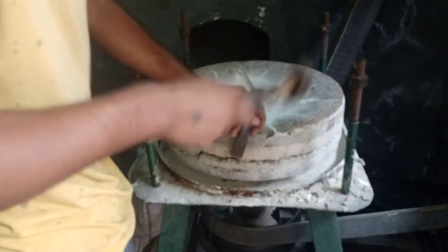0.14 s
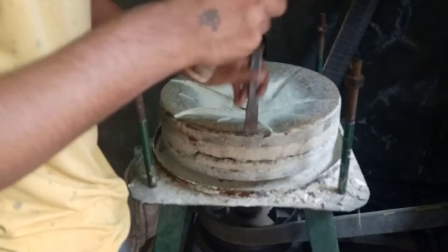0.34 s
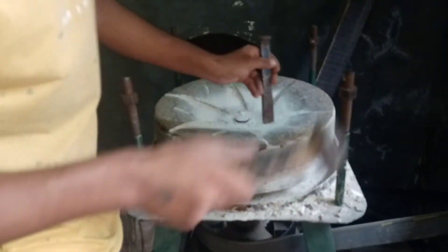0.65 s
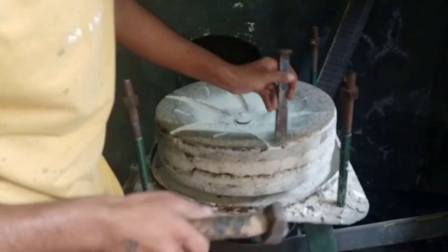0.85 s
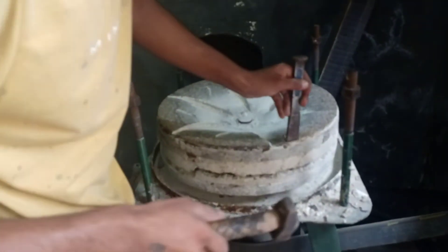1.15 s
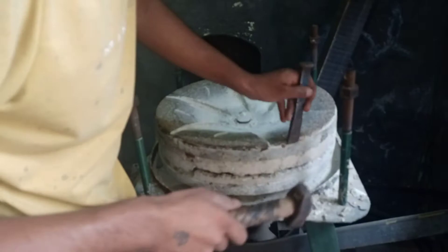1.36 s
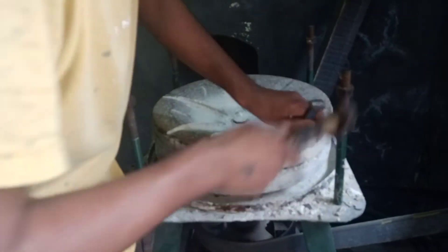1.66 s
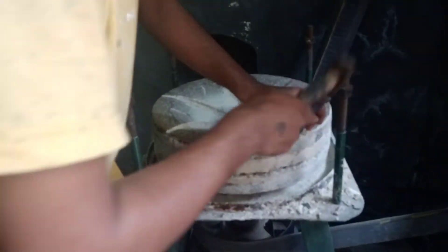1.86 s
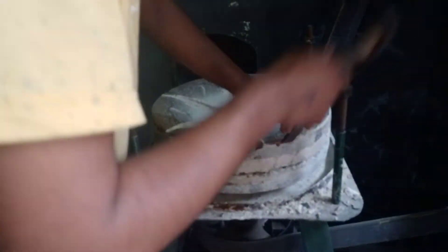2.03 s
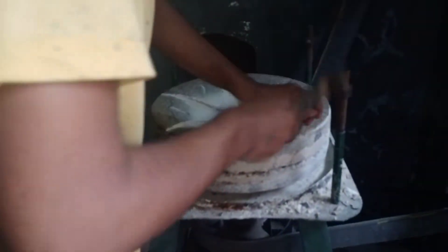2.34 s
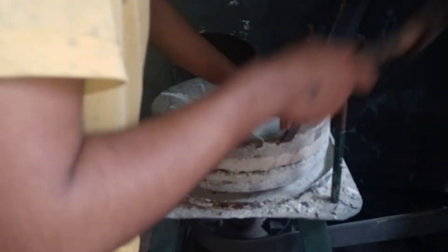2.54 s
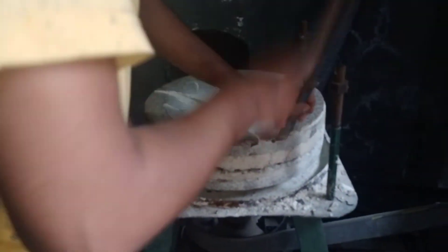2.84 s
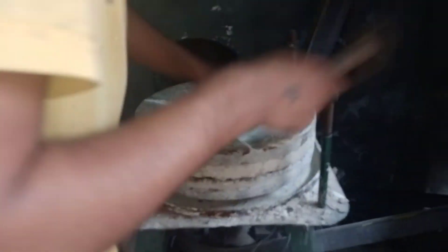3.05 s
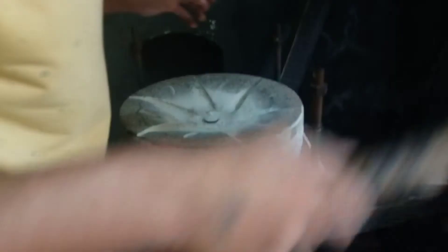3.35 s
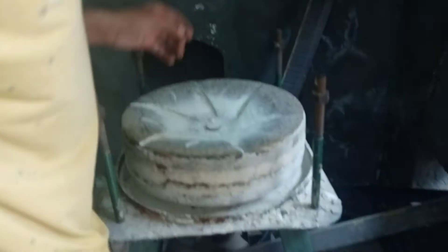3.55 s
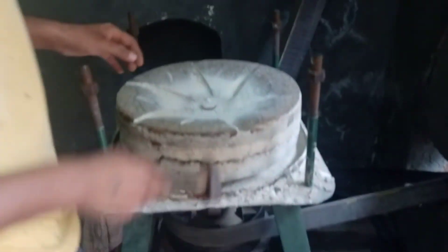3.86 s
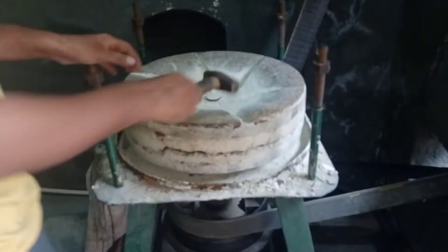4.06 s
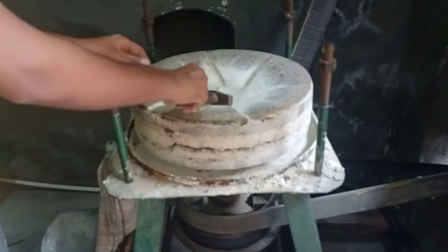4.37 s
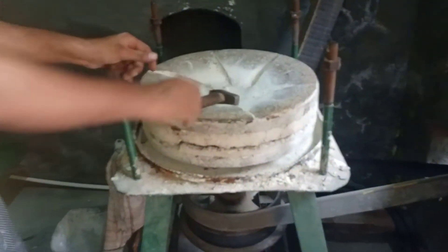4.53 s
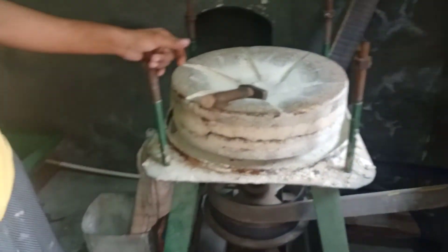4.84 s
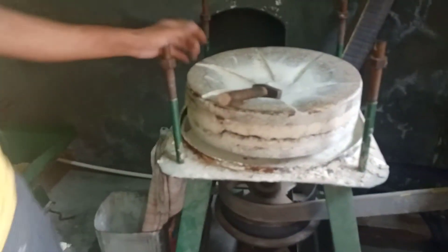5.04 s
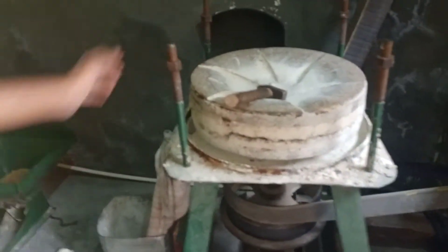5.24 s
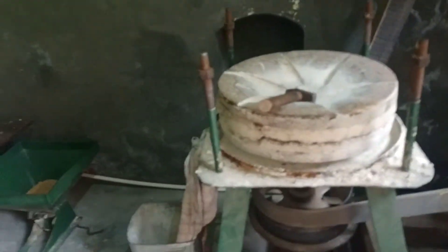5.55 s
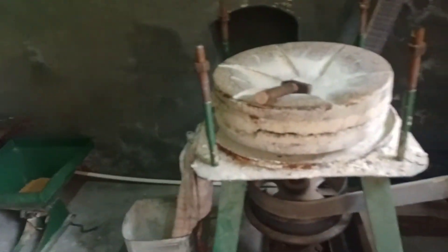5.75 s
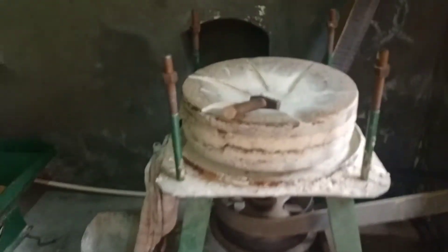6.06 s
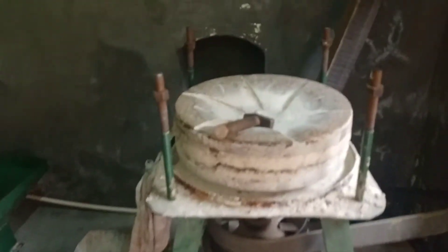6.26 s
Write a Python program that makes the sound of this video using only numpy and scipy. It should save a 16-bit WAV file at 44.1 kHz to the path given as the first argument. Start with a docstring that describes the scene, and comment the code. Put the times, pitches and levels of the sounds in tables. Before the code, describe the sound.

In a small bare shed, heard close on a phone microphone, a hammer cracks a steel chisel on a millstone once, pauses with scraping, ticks and a wooden handle knock, then strikes three more times. The chisel flies loose, crashes on steel fittings and bounces ringing to rest. The hammer is set down with a wooden knock, and hands brush off dust in soft swishes.

```python
"""In a bare shed, a phone close by, an earlier blow fades; then a hammer drives a steel chisel on a millstone.
Hits are noise cracks and tails over decaying modes; between blows the tip ticks and drags as filtered noise and
the wooden handle knocks. At the fourth blow the chisel flies off, its modes swelling as it tumbles; it crashes
on steel fittings and bounces to rest. The hammer is laid down and hands brush off dust, in swelling noise with
small taps. Faint chirps, trilled sine notes, come from outdoors, over the noise of shed air and a low rumble."""
import sys
import numpy as np
from scipy import signal
from scipy.fft import rfft, irfft, next_fast_len
from scipy.io import wavfile
from scipy.ndimage import uniform_filter1d, minimum_filter1d

SR = 44100
rng = np.random.default_rng(int(sys.argv[2]) if len(sys.argv) > 2 else 0)


def transcribe(u):
    """Save the signal u as a 16-bit wav file named by the first command-line argument.

    u: samples, shape (n,) or (channels, n), limited to [-1, 1]; the rate is SR.
    q: integer samples, one column per channel.
    """
    v = np.clip(np.atleast_2d(u).T, -1, 1)
    q = np.round(v * 32767).astype(np.int16)
    wavfile.write(sys.argv[1], SR, q)


def volts_from_decibels(level):
    """Turn decibel levels (scalar or array-like) into linear amplitude factors."""
    exponent = np.asarray(level, float) / 20
    return 10 ** exponent


N = 282180
T = np.arange(N) / SR
BANDS_HZ = 50 * 2 ** np.arange(0, 8.4, 1 / 3)  # third-octave centres


def on_bands(hz, values):
    """Read a short spectrum at the third-octave centres."""
    return np.interp(np.log(BANDS_HZ), np.log(hz), values)


def unit(x):
    """Scale each row to rms 1."""
    return x / np.sqrt(np.mean(x ** 2, axis=-1, keepdims=True))


def split(x):
    """Third-octave bands that add up to the input between the outer centres."""
    size = next_fast_len(N)
    octave = np.log2(np.fft.rfftfreq(size, 1 / SR) + 1e-9)
    away = np.clip(3 * (octave - np.log2(BANDS_HZ)[:, None]), -1, 1)
    return irfft(rfft(x, size) * np.cos(np.pi / 2 * away) ** 2, size)[:, :N]


def clicks(times, sizes):
    """An impulse train."""
    x = np.zeros(N)
    np.add.at(x, (np.asarray(times) * SR).astype(int), sizes)
    return x


def ring(x, hz, t60, rise_s):
    """One mode that builds up over rise_s to about 1 for a unit impulse; at 0 Hz a plain decay."""
    turn = np.exp(2j * np.pi * hz / SR) if hz else 1
    rise = np.exp(-1 / (rise_s * SR + 1e-3))
    fall = np.exp(-np.log(1000) / max(t60, .002) / SR)
    return signal.lfilter([1 - rise], np.poly([turn * rise, turn * fall]), x)


def walk(rate):
    """Slow random drift of rms 1, with rate new values per second."""
    k = int(SR / rate)
    return unit(uniform_filter1d(np.repeat(rng.standard_normal(N // k + 1), k), k)[:N])


def struck(modes, times, db, scatter_db, waver_db):
    """Every blow shares itself a little differently among the modes, which waver as they ring."""
    share_db = scatter_db * rng.standard_normal((len(times), len(modes)))
    out = 0
    for k, (hz, t60) in enumerate(modes):
        jolts = clicks(times, volts_from_decibels(db[:, k] + share_db[:, k]))
        out = out + volts_from_decibels(waver_db * walk(50)) * ring(jolts, hz, t60, .5 / hz).imag
    return out


# The air standing in the bare shed. Each row: frequency in Hz, relative level in dB per Hz.
SHED_AIR = [(18, -60), (30, -38), (112, -8), (149, -20), (227, 5.5), (345, 7), (404, 2), (3490, -13.5),
            (4650, -21), (5170, -20), (5900, -28), (6380, -85), (16000, -67)]
SHED_DB = -58.5
# Low rumble from outside the shed. Each row: time in seconds, level in dB.
RUMBLE = [(0, -78), (1, -53), (2, -64.5), (4.4, -59.5), (4.8, -49), (5.6, -51), (6.4, -55.5)]


def shed(noise):
    """Quiet air of the shed, drifting band by band, and a low rumble that comes and goes."""
    air_db = on_bands(*np.transpose(SHED_AIR)) + 10 * np.log10(BANDS_HZ)
    air = unit(sum(volts_from_decibels(db + walk(4.4)) * band for db, band in zip(air_db, noise)))
    rumble = unit(volts_from_decibels(on_bands([49.6, 112.3, 160, 282], [-21, 1.0, 3.5, -26])) @ noise)
    return volts_from_decibels(SHED_DB) * air + volts_from_decibels(np.interp(T, *np.transpose(RUMBLE))) * rumble


# Faint chirps outdoors, far off. Each row: first start in seconds, length in seconds, level in dB.
CHIRPS = [(1.075, 0.12, -66.5), (1.03, 0.14, -69), (1.22, .18, -70), (1.02, .13, -77), (4.812, .07, -66),
          (5.161, 0.019, -50.5), (5.296, .093, -58)]
# Their pitches in Hz, one a row, and how many times each is heard.
CHIRP_HZ = [4850, 4560, 3900, 5800, 4880, 6370, 6360]
CHIRP_COUNT = [4, 4, 3, 4, 3, 1, 1]
CHIRP_EVERY_S = 0.263


def chirps():
    """Thin trilled notes from far off: sines wavering at random in level and phase."""
    out, trill, wobble = np.zeros(N), volts_from_decibels(4.6 * walk(90)), walk(120)
    for (first, length, db), hz, count in zip(CHIRPS, CHIRP_HZ, CHIRP_COUNT):
        for s in first + CHIRP_EVERY_S * np.arange(count):
            on = (T > s) & (T < s + length)
            note = np.sin(2 * np.pi * hz * T[on] + wobble[on])
            out[on] += volts_from_decibels(db) * note * trill[on] * signal.windows.tukey(on.sum(), .4)
    return out


# Fine dust under the hands. Each row: frequency in Hz, relative level in dB per Hz.
DUST = [(4000, 7.5), (6000, -0.5), (8500, 10), (10500, -2.5), (13500, -5), (15500, 0.5)]
# Hands brushing, near the phone. Each row: time of the peak in seconds, level in dB, rise and fall in seconds
# to 20 dB below the peak, dust in dB over the level, pitch of the cupped palm in Hz.
STROKES = [(4.638, -48, 0.11, 0.16, 0, 1800), (5.021, -41, 0.13, 0.071, -8.5, 2300),
           (5.225, -41, 0.073, .12, -6, 2000), (5.479, -49.5, 0.028, 0.17, -7, 2550),
           (5.59, -48, 0.049, 0.17, 3.5, 1650), (5.83, -38, 0.2, 0.1, -7, 1900),
           (5.958, -49.5, 0.055, 0.21, -4.5, 2000), (6.12, -32, 0.13, .14, -13.5, 2130)]
PALM_HZ = 2194
STROKE_ROUND = 1.4  # exponent: above 1 the peak of a stroke is rounded
CUP_DB, CUP_T60_S = -6, 0.034


def brushing(noise):
    """Dry friction: the hollow hump of the palm and fine dust hiss, rising to each stroke's peak and falling away."""
    dust_db = on_bands(*np.transpose([(2500, -10.5)] + DUST)) + 10 * np.log10(BANDS_HZ / 8500)
    dust, white = unit(volts_from_decibels(dust_db) @ noise), rng.standard_normal(N)
    octaves_away = np.abs(np.log2(BANDS_HZ / PALM_HZ))
    hump = volts_from_decibels(-7.0 - 20.0 * octaves_away - 1.8 * np.minimum(octaves_away / 2.2, 1)) @ noise
    out = 0
    for s, db, rise_s, fall_s, dust_over_db, hz in STROKES:
        progress = np.where(T < s, (s - T) / rise_s, (T - s) / fall_s)
        stroke_db = db - 20 * progress ** STROKE_ROUND
        cup = volts_from_decibels(CUP_DB) * unit(ring(white, hz, CUP_T60_S, 0).imag)
        out = out + volts_from_decibels(stroke_db) * (hump + cup + volts_from_decibels(dust_over_db) * dust)
    return out * volts_from_decibels(walk(40) + 1.37 * walk(400))  # the friction flutters


# Hammer handle on the stone. Each row: start in seconds, level in dB, tilt in dB per octave away from the centre,
# tail in dB over the level.
KNOCKS = [(1.172, -18.5, -16.5, -10.5), (1.401, -45.5, -1, -13), (4.477, -14, 4.5, -13.5)]
# Hollow wooden modes. Each row: frequency in Hz, level in dB over the knock, T60 in seconds.
HANDLE_MODES = [(380, -20, 0.51), (536, -16, 0.43), (708, -2.5, 0.18), (882, -13, 0.4), (960, -11, 0.18),
                (1022, -9.5, 0.31), (1330, 5, 0.04), (1556, -4, 0.21), (1910, -11, 0.16), (2250, -21, 0.25)]
HANDLE_CENTRE_HZ = 787


def handle(noise):
    """The wooden hammer handle knocks on the stone: hollow modes and a dull tail in the shed."""
    s, db, tilt_db, tail_db = np.transpose(KNOCKS)
    hz, mode_db, t60 = np.transpose(HANDLE_MODES)
    tilted_db = np.outer(tilt_db, np.abs(np.log2(hz / HANDLE_CENTRE_HZ)))
    modes = struck(list(zip(hz, t60)), s, db[:, None] + mode_db + tilted_db, scatter_db=4.0, waver_db=4.0)
    dull_db = on_bands([150, 400, 1000, 1700, 2600, 4500, 9000], [-32, -10.0, 1.5, -3, -11.5, -34, -89])
    octaves_away = np.abs(np.log2(np.clip(BANDS_HZ, 300, 3000) / HANDLE_CENTRE_HZ))
    tail = 0
    for start, level_db, tilt in zip(s, db + tail_db, tilt_db):
        decay = ring(clicks([start], volts_from_decibels(level_db)), 0, 0.35, 0.00023)
        tail = tail + decay * (volts_from_decibels(dull_db + tilt * octaves_away) @ noise)
    return uniform_filter1d(uniform_filter1d(modes, size=3), size=5) + tail  # wood pushes softly


# Chisel tip dragged over the stone. Each row: start in seconds, end in seconds, dB at the start, dB at the end.
DRAGS = [(0.38, 1.001, -45, -51), (2.59, 2.953, -40, -52.5)]
# What the drag keeps hissing. Each row: frequency in Hz, width in Hz, relative level in dB per Hz of width.
DRAG_MODES = [(726, 19.5, -1), (1062, 11, 4.5), (1380, 44, -8), (1500, 10, 3.5), (2310, 33, -2.5),
              (3075, 70, -11.5), (3640, 84, -20), (4920, 79, -16), (5500, 24, -18), (6800, 63, -24),
              (7200, 50, -19.5), (8100, 60, -21), (8500, 116, -14.5), (11700, 54, -28)]


def dragging(noise):
    """The tip scrapes over the stone and keeps the modes of stone and chisel hissing."""
    white = rng.standard_normal(N)
    lines = 0
    for hz, width, db in DRAG_MODES:
        hiss = unit(ring(white, hz, 2.2 / width, 0).imag)
        lines = lines + volts_from_decibels(db) * hiss * np.sqrt(width)
    bed_db = on_bands([300, 800, 2000, 4000, 6000, 8500, 11000, 15000],
                      [-5.5, -4.0, 10.5, -11.5, -9.5, -18.0, -33.5, -34])
    bed = unit(volts_from_decibels(bed_db) @ noise)
    press = 0
    for start, end, start_db, end_db in DRAGS:
        press = press + volts_from_decibels(np.interp(T, [start, end], [start_db, end_db], -120, -120))
    return uniform_filter1d(press, size=5000) * (bed + volts_from_decibels(-0.5) * unit(lines))


# Steel that the chisel lands on: its modes in Hz, and the two contacts in seconds.
FITTING_HZ = [2530, 4285, 4657, 7066, 7801, 8312, 8549, 9099, 9546, 9990, 11550, 12857, 13170, 13410, 13640,
              14011, 14210, 15217]
FITTING_HITS_S = [3.306, 3.405]
# Each row, one a mode: dB at the first contact, dB at the second, T60 in seconds.
FITTING_MODES = [(-39, -34.5, 0.87), (-45.5, -41, .9), (-47.5, -42.5, .9), (-42, -35, 0.67),
                 (-33.5, -36, 0.65), (-57.5, -40.5, 1.1), (-39.5, -48.5, .5), (-38, -31, 1.31),
                 (-49.5, -30.5, 1), (-59.5, -57, 0.62), (-48, -38, 0.82), (-24, -47, 0.41), (-40, -44, .8),
                 (-39, -39.5, 1), (-46.5, -58, 1), (-58, -33, 0.81), (-48, -57, 0.57), (-28, -37, .8)]


def fitting():
    """High long rings of the steel under the fall."""
    first_db, second_db, t60 = np.transpose(FITTING_MODES)
    contact_db = np.array([first_db, second_db])
    return struck(list(zip(FITTING_HZ, t60)), FITTING_HITS_S, contact_db, scatter_db=1, waver_db=5)


# Ragged noise bursts at the blows and the crash. Each row: start in seconds, length in seconds, level in dB,
# bass in dB over it before the colour below, 3 kHz clank in dB over it.
BURSTS = [(0.15, 0.019, -7.5, 12, 11), (1.991, 0.011, -16, -12.5, 8.5), (2.443, 0.026, -13, 6, 17),
          (2.971, 0.03, -3.5, -1.5, 13.5), (3.014, 0.025, -7.5, -6, 14.5), (3.308, 0.099, -5.5, -9, 2.5),
          (3.399, 0.079, -12.5, -7, 0.5), (3.47, 0.032, -23, 20, -14)]
BURST_TREBLE_DB = -15


def ragged_bursts():
    """Ragged noise bursts: among them the overloaded microphone at the fourth blow and the clatter of the crash."""
    ragged_db = 1.13 * rng.exponential(1, N) + 1.15 * walk(150)
    grit = split(rng.standard_normal(N) * volts_from_decibels(ragged_db))
    out = np.zeros(N)
    for s, length, db, bass_db, clank_db in BURSTS:
        i, j = int(s * SR), int((s + length) * SR)
        colour_db = on_bands([60, 250, 1000, 2200, 3100, 4200, 6500, 15000],
                             [bass_db - 11, bass_db, 0, 0, clank_db, -6, BURST_TREBLE_DB, BURST_TREBLE_DB - 4])
        burst = unit(volts_from_decibels(colour_db) @ unit(grit[:, i:j]))
        out[i:j] += volts_from_decibels(db) * burst * signal.windows.tukey(j - i, .15)
    return out


# Treble resonances, narrow and broad. Each row: frequency in Hz, width in Hz.
TREBLE_HUMPS = [(3300, 67), (5700, 190), (8500, 2400), (11300, 160), (14500, 890)]


def banded(x):
    """Treble resonances, narrow and broad, over a ragged thicket of small ones."""
    size = next_fast_len(N)
    f = np.fft.rfftfreq(size, 1 / SR)
    humps = 1 + sum(2.9 / (1 + (2 * (f - hz) / width) ** 2) for hz, width in TREBLE_HUMPS)
    thicket_db = 2.5 * unit(uniform_filter1d(rng.standard_normal(len(f)), int(40 * size / SR)))
    return irfft(rfft(x, size) * humps * volts_from_decibels(thicket_db), size)[:N]


# All hit levels below are before the shared colour of stone and shed.
# The fading end of an earlier blow. One row: start in seconds, level in dB, then bass, low mid, treble, top and
# tail in dB over it.
EARLIER_BLOW = (0, -51.5, 0.5, -6, -23, -36, 7.5)
# Hammer on chisel. Each row: start in seconds, 1.2-4 kHz level in dB, 500-1200 Hz in dB over it, tail in dB
# over it, level in dB that the stand's hum gets.
BLOWS = [(0.1474, -4, -8.5, -4, -27), (1.9924, -5, -3.5, -12, -39), (2.4427, -3.5, -8, -7.5, -25.5),
         (2.9676, 1.5, -9, -14, -59)]
BLOW_BASS_DB, BLOW_TREBLE_DB, BLOW_TOP_DB = -19, -20.5, -18.5  # over the blow
# The loose chisel touching down. Each row: start in seconds, level in dB, treble in dB over it, tail in dB over it.
BOUNCES = [(3.054, 0.5, -33.5, -12.5), (3.3057, -1.5, -23, -5.5), (3.405, -21.5, -8.5, -11.5),
           (3.679, 3, -32, -16.5), (3.9175, -5, -39, -15.5), (4.026, -19.5, -25, -36),
           (4.091, -25, -33, -1), (4.1222, -20.5, -30, -5.5), (4.1685, -36, -25, -6.5),
           (4.192, -20, -22, -25), (4.2661, -15, -24, -21.5), (4.2745, -15.5, -22, -14),
           (4.3229, -16, -18, -23), (4.3444, -18, -18, -39)]
BOUNCE_BASS_DB, BOUNCE_MID_DB = -28, -18
SOFT_TOP_DB = -9.5  # top octave of a bounce over its treble
# Light ticks: the chisel tip on the stone early, small unidentified taps late. Each row: start in seconds,
# level in dB, 500-1200 Hz in dB over it, treble in dB over it.
TICKS = [(0.5891, -27.5, -18, -25.5), (1.4531, -32.5, -13, -15.5), (1.607, -39, -22, -21),
         (5.4496, -42, -27, -21), (5.978, -48, -1, -23)]
TICK_BASS_DB, TICK_TAIL_DB = -37, -9.5


def all_hits():
    """Every contact as (s, dB, bass, low mid, treble, top, tail)."""
    hits = [EARLIER_BLOW]
    for s, db, mid, tail, _ in BLOWS:
        hits.append((s, db, BLOW_BASS_DB, mid, BLOW_TREBLE_DB, BLOW_TOP_DB, tail))
    for s, db, high, tail in BOUNCES:
        hits.append((s, db, BOUNCE_BASS_DB, BOUNCE_MID_DB, high, high + SOFT_TOP_DB, tail))
    for s, db, mid, high in TICKS:
        hits.append((s, db, TICK_BASS_DB, mid, high, high, TICK_TAIL_DB))
    return np.array(hits)


# Colour of stone and shed: the frequencies in Hz, and the dB added to every hit at each.
BAND_HZ = [60, 270, 780, 2200, 3600, 6300, 9000, 15000]
HIT_SHAPE_DB = [-24.5, -5, -5, -12, -9, -7.5, -7, -12]


def hit_colour():
    """dB of every hit in every band: its own spectrum plus the colour of stone and shed."""
    s, db, low, mid, high, top, tail = all_hits().T
    steps = np.array([low, low, mid, 0 * db, 0.47 * high, high, high, top]).T
    return db[:, None] + np.array([on_bands(BAND_HZ, row + HIT_SHAPE_DB) for row in steps])


# How long a hit lingers in the shed: T60 in seconds of the slow tail, at the frequencies above.
TAIL_T60_S = [0.84, 0.72, 0.42, 0.36, 0.38, 0.28, 0.49, 0.1]
CRACK_T60_S, CRACK_DB = .016, 3
FILL_DB, FILL_S = -2, 0.049  # level and build-up time of the slow tail


def impacts(noise):
    """A short crack and a tail held level briefly by compression; bass lasts longest, the top octave dies first."""
    hits = all_hits()
    s, tail_db = hits[:, 0], hits[:, -1]
    out = 0
    for band, hz, db, t60 in zip(noise, BANDS_HZ, hit_colour().T, on_bands(BAND_HZ, TAIL_T60_S)):
        crack = ring(clicks(s, volts_from_decibels(db + CRACK_DB)), 0, CRACK_T60_S, min(0.96 / hz, .001))
        jolts = clicks(s, volts_from_decibels(db + tail_db))
        early = ring(jolts, 0, t60 / 3, min(1 / hz, .004))
        late = volts_from_decibels(FILL_DB) * ring(jolts, 0, t60, FILL_S)
        out = out + band * (crack + early + late)
    return out


# Millstone and its stand. Each row: frequency in Hz, level in dB before a stretch by 1.2, T60 in seconds.
STONE_MODES = [(379, -7, 0.35), (650, -7.5, 0.46), (865, -24, 0.13), (911, -15, 0.46), (1011, -11, 0.51),
               (1350, -10.5, 0.234), (1480, -9, 0.21), (1670, -9.5, 0.19), (1935, -6.5, 0.15),
               (2380, -7.5, 0.13), (3130, -11, 0.44), (3305, -11.5, .45)]
# Steel stand under the stone. Each row: frequency in Hz, level in dB, T60 in seconds.
STAND_MODES = [(121, -5, 0.69), (168, 0, 1.19), (325, -17.5, 3.94), (652, 1, 0.31)]
HUM_DELAY_S = 0.068


def stone():
    """The millstone's short modes and the long low hum of its steel stand, heard late as the gain recovers."""
    s, colour = all_hits()[:, 0], hit_colour()
    hz, db, t60 = np.transpose(STONE_MODES)
    at_modes = np.array([np.interp(np.log(hz), np.log(BANDS_HZ), row) for row in colour])
    body = struck(list(zip(hz, t60)), s, at_modes + 1.2 * db, scatter_db=3.0, waver_db=5.5)
    blow_s, hum_db = np.array(BLOWS)[:, [0, -1]].T
    jolts = uniform_filter1d(clicks(blow_s + HUM_DELAY_S, volts_from_decibels(hum_db)), 9)
    hum = sum(volts_from_decibels(mode_db) * ring(jolts, f, decay_s, 0.12).imag for f, mode_db, decay_s in STAND_MODES)
    return body + hum


# The chisel's modes in Hz, and the order of bending across the flat that the place struck acts on;
# 0 = level does not depend on the place struck.
CHISEL_HZ = [1560, 3344, 3359, 4047, 4063, 4089, 5486, 7461, 8755, 8802, 8842, 10810, 11060, 11110, 11850,
             14535, 14720]
CHISEL_ORDER = [1, 0, 0, 2, 2, 2, 0, 3, 0, 0, 0, 0, 0, 0, 0, 0, 0]
# Each row, one a mode: dB over the blow's treble when gripped, before a 4 dB cut; dB over its family when free;
# dB per second gained as the bounces shrink.
CHISEL_MODES = [(-33, 3, -1), (2, -6, -3.5), (-15.5, -0.5, -1.5), (-4.5, -13, -3), (-4.5, 1.5, 2),
                (-7, -7, -3.5), (-15, -27, 10.5), (-8, -13.5, 3), (-7.5, -9.5, -6.5), (5.5, -6, -0.5),
                (-8.5, -12.5, -6), (-29, -43.5, 6), (-33, -22.5, -1.5), (-13.5, -33.5, 8), (-21, -33, 10.5),
                (-4.5, -10.5, -9), (-10, -27.5, -7)]
# Each free flight, from the contact that starts it. Each row: start in seconds, modes with an order in dB, other
# modes in dB, treble in dB over them, place struck as share of the length, half turns per second.
FLIGHTS = [(2.976, -32, -39, 14, 0.36, 6.8), (3.06, -34.5, -41.5, 10, 0.4, 4),
           (3.311, -28.5, -30, 4, 0.42, 6.6), (3.492, -31.5, -32.5, 0.5, .48, 12),
           (3.68, -18.5, -16.5, -8, 0.18, 9.2), (3.9195, -23.5, -25.5, -9.5, 0.41, 8.8),
           (4.0286, -29, -32, -7, 0.47, 11.4), (4.0927, -26, -33.5, -1.5, 0.41, 12.4),
           (4.191, -30.5, -35, -6.5, 0.43, 16.3), (4.2645, -26.5, -45.5, 6, 0.38, 5.1),
           (4.322, -33, -46.5, 9.5, 0.39, 12)]
GRIP_T60_S = 0.2
REST_S = 4.4  # the chisel lies down and its ring is stifled
TREBLE_HZ = 5000
NODE_LEAK, SIDE_ON_LEAK = 0.01, 0.39  # what still sounds when struck on a node, or seen side on
EDGE_LEAD_RAD = 0.62  # the edge comes round ahead of the flat
LOSS_DB_PER_S_KHZ = 2.5


def chisel():
    """Gripped, modes die fast; free, each contact restarts them, some by where it lands, and they swell as it turns."""
    grip_db, free_db, gain_db = np.transpose(CHISEL_MODES)
    s, db = np.array(BLOWS)[:, :2].T
    blow_db = (db + BLOW_TREBLE_DB)[:, None] + grip_db - 4
    out = struck([(f, GRIP_T60_S) for f in CHISEL_HZ], s, blow_db, scatter_db=2, waver_db=4)

    loose_s = FLIGHTS[0][0]
    on = (T >= loose_s) & (T < REST_S + 1 / 4)
    t = T[on]
    flight = np.searchsorted(np.array(FLIGHTS)[:, 0], t, "right") - 1
    start, flat_db, other_db, treble_db, place, spin = np.array(FLIGHTS)[flight].T
    since = t - start
    angle = np.pi * spin * since
    flat_on = SIDE_ON_LEAK + np.abs(np.sin(angle))
    edge_on = SIDE_ON_LEAK + np.abs(np.sin(angle + EDGE_LEAD_RAD))
    for k, (f, order, mode_db, gain) in enumerate(zip(CHISEL_HZ, CHISEL_ORDER, free_db, gain_db)):
        shape = NODE_LEAK + np.abs(np.sin(np.pi * ((order + .5) * place - 1 / 4))) if order else 1
        level_db = (flat_db if order else other_db) + mode_db + gain * (t - loose_s)
        level_db += treble_db * (f > TREBLE_HZ) - LOSS_DB_PER_S_KHZ * f / 1000 * since
        level_db += (1.5 + f / 4000) * walk(50)[on]  # high modes flutter more
        level_db -= 300 * np.clip(t - REST_S, 0, 1)  # stifled at rest
        # phase restarts at the contact; close pairs start opposed, then beat
        fresh = (-1) ** k * np.exp(-2j * np.pi * f * start)
        facing = flat_on if order else edge_on
        swell = uniform_filter1d(volts_from_decibels(level_db) * shape * facing * fresh, size=150)
        out[on] += np.sqrt(2) * (swell * np.exp(2j * np.pi * f * t)).imag
    return out


def scene():
    """All sources at the phone."""
    struck_noise = unit(split(banded(rng.standard_normal(N))))
    smooth_noise = unit(split(rng.standard_normal(N)))
    background = shed(smooth_noise) + chirps()
    rubbed = brushing(smooth_noise) + dragging(smooth_noise)
    steel = fitting() + ragged_bursts() + chisel()
    hits = handle(struck_noise) + impacts(struck_noise) + stone()
    return (background + rubbed + steel + hits)[None]


def roll_off(x):
    """The treble ends steeply here."""
    return signal.sosfilt(signal.butter(12, 16750, fs=SR, output="sos"), x)


def record(dry):
    """A look-ahead gain control ducks just before each loud blow; peaks left over are rounded; deep bass and top cut."""
    ahead = int(.022 * SR)
    loud_db = 10 * np.log10(uniform_filter1d(dry[0] ** 2, 130) + 1e-12)
    wanted_db = np.minimum(0, -7.5 - loud_db)
    held_db = minimum_filter1d(wanted_db, ahead, origin=-(ahead // 2))  # the lowest gain wanted soon
    ducked = dry * volts_from_decibels(uniform_filter1d(held_db, 150))
    x = ducked / (1 + np.abs(ducked / .97) ** 4) ** (1 / 4)
    x = signal.sosfilt(signal.butter(3, 55, "high", fs=SR, output="sos"), x)
    x = signal.sosfilt(signal.ellip(6, .3, 30, 15700, fs=SR, output="sos"), x)
    return roll_off(x)


dry = scene()
out = record(dry)
transcribe(out)
```